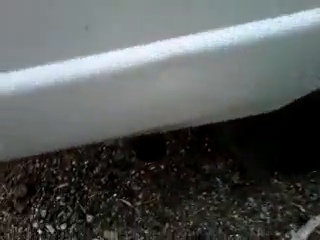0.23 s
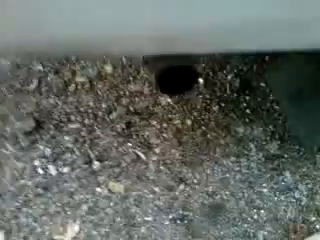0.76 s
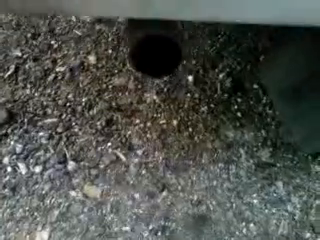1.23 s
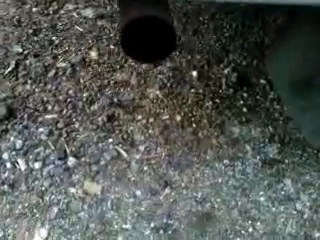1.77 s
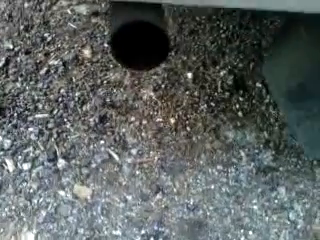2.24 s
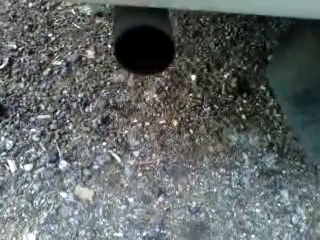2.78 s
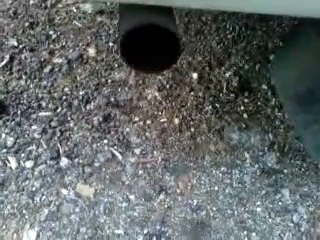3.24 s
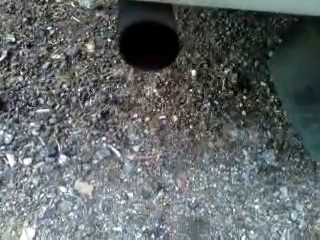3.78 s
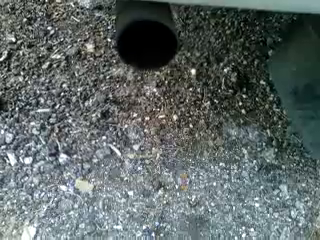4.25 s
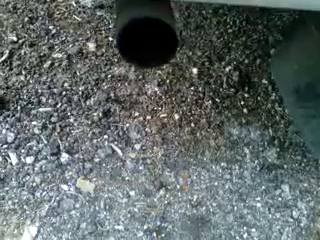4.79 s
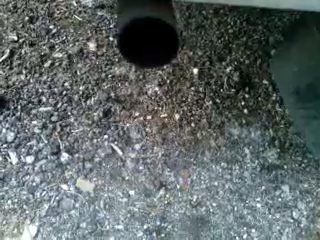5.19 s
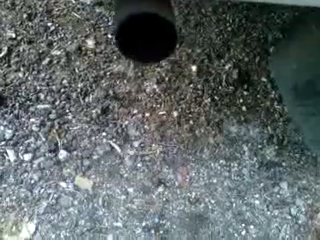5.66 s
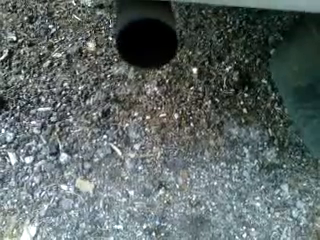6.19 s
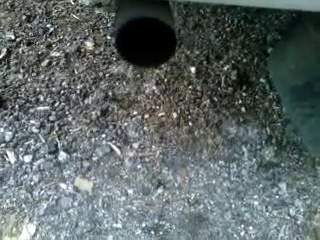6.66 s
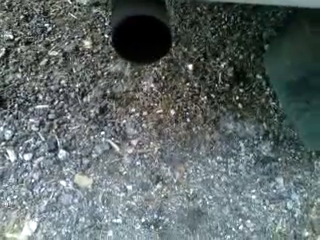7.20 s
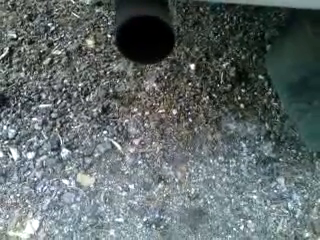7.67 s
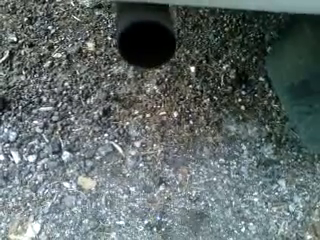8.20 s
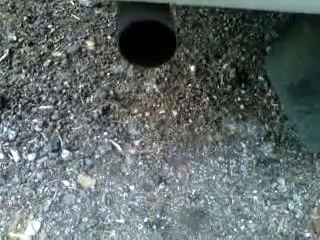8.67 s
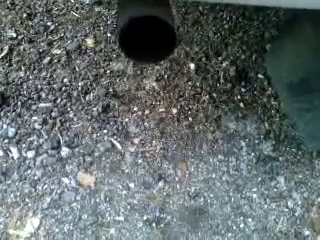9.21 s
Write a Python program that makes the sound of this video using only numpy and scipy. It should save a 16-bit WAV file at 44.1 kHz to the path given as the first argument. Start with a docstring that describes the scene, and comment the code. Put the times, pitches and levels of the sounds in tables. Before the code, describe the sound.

A small four-cylinder engine is already idling at the start, heard outdoors close to the tailpipe above gravel. About twenty-six soft puffs a second merge into a throbbing, fluttering low rumble; the speed wavers slightly, so a hollow pipe drone repeatedly swells and fades. Rushing air and thin hiss lie over it. A tiny scuff comes at once, then a small damped knock with scuffing at 0.5 seconds and a faint high squeak near 0.9. From 0.7 seconds irregular firings thud dully, strongest around 0.8 and 1.3, then scattered until 7.8. The exhaust grows closer, bassier and more buffeting by 1.3 seconds, its pipe tone opening fully by 2.6. Near 4 seconds it drops back abruptly. Faint high scuffs pass at 3.4 and 4.2. Treble hiss flickers from 4.7 onward; the idle continues unbroken to the end, about 9.4 seconds.

```python
"""A small four-cylinder engine idles, heard close to the tailpipe over gravel.
From the start, each firing pushes out a puff that throbs, sounds the muffler and flutters in the pipe.
As the idle hunts, its seventh order drifts on and off a pipe resonance and booms; air rushes under the car
and a treble hiss lies on top. Scuffs of narrow noise come now and then, a small damped body is
knocked at half a second, and from 0.7 s on uneven firings thud as single dips of pressure."""
import sys
import numpy as np
from scipy import signal
from scipy.fft import rfft, irfft
from scipy.io import wavfile
from scipy.ndimage import uniform_filter1d

SR = 44100
rng = np.random.default_rng(int(sys.argv[2]) if len(sys.argv) > 2 else 0)


def pcm_store(signal):
    """Save signal as 16-bit PCM."""
    levels = np.round(np.clip(np.atleast_2d(signal), -1, 1) * 32767)
    wavfile.write(sys.argv[1], SR, levels.astype(np.int16).T)


N = 415863
TIME = np.arange(N) / SR   # s

# uneven firings that thud: (time [s], relative level [dB])
THUD_FIRINGS = [(0.668, -38), (0.764, -26), (0.932, -32), (1.273, -22), (2.44, -29), (2.99, -36),
                (3.302, -34), (3.573, -30), (4.699, -33.5), (5.005, -30), (5.741, -32.5), (6.117, -30),
                (6.587, -31.5), (7.815, -31.5)]
IDLE_HZ = 25.7   # reference firing rate


def from_db(db):
    """Level law: 20 dB is a factor of ten in pressure."""
    return 10 ** (np.asarray(db) / 20)


def rms_one(x):
    """Normalise the effective (root mean square) pressure to 1."""
    return x / np.sqrt(np.mean(x ** 2) + 1e-20)


def in_time(rows):
    """Linear interpolation: each column of a curve at every sample."""
    times, *columns = np.transpose(rows)
    return [np.interp(TIME, times, column) for column in columns]


def cut(x, hz, kind, order=2):
    """Butterworth filtering: a maximally flat passband."""
    return signal.sosfilt(signal.butter(order, hz, kind, fs=SR, output="sos"), x)


def resonate(x, modes):
    """Modal superposition: parallel damped resonances, each with peak gain 1 before its own level."""
    out = 0
    for k, (hz, width, db) in enumerate(modes):
        radius = np.exp(-np.pi * width / SR)   # a wider resonance decays faster
        poles = [1, -2 * radius * np.cos(2 * np.pi * hz / SR), radius * radius]
        ring = signal.lfilter([1, 0, -1], poles, x + 1e-18) * (1 - radius * radius) / 2
        out = out + (-1) ** k * from_db(db) * ring   # neighbours have opposite signs
    return out


def even(x, size=6850):
    """Automatic gain: divide by the running rms over a few firings."""
    power = uniform_filter1d(uniform_filter1d(x ** 2, size), size // 2)
    return x / np.sqrt(power + 1e-20)


def noise(spectrum):
    """Spectral shaping: white noise weighted by a colour, rms 1."""
    hz, db = np.transpose(spectrum)
    bins_hz = np.maximum(np.arange(N // 2 + 1) * SR / N, 1)
    gain = from_db(np.interp(np.log(bins_hz), np.log(hz), db))
    return rms_one(irfft(rfft(rng.standard_normal(N)) * gain, N))


def drift(hz):
    """Random modulation: low-passed noise wanders slowly with spread 1."""
    return noise([(hz / 2, 0), (hz, -3), (hz * 2, -14), (hz * 10, -70)])


def settle(x):
    """First-order relaxation: a control is followed with the inertia of the pipe."""
    build_up_s = 0.046   # time constant
    r = np.exp(-1 / (build_up_s * SR))
    return x[0] + signal.lfilter([1 - r], [1, -r], x - x[0])


def puffs(turns, depth_db, lag):
    """Amplitude modulation: turbulence swells and ebbs once in every firing, timed by the lag [cycles]."""
    return rng.standard_normal(N) * from_db(depth_db * np.cos(2 * np.pi * (turns - lag)))


def throb(turns, lag, buffet_db):
    """Monopole pulsation at the firing rate, with gas buffeting the microphone."""
    swing = -np.sqrt(2) * np.cos(2 * np.pi * (turns - lag))
    buffet = rms_one(cut(puffs(turns, depth_db=-0.5, lag=lag), [10, 45], "band"))
    return swing + from_db(buffet_db) * buffet


def muffler(turns, rough_db):
    """Harmonic series of low orders, blurred by turbulence ringing in the chambers."""
    # firing orders from the second upward: (relative level [dB], lag [cycles])
    low_orders = [(-5, 0.34), (-8, 0.5), (-6.5, .15), (-19.5, 0.45)]
    # chamber resonances: (frequency [Hz], width [Hz], relative level [dB])
    chambers = [(41, 4, -12.5), (74.6, 8.5, 2), (88, 24, -2), (111.8, 58, -7)]
    lines = 0
    for k, (db, lag) in enumerate(low_orders, 2):
        lines = lines + from_db(db) * np.sqrt(2) * np.cos(2 * np.pi * (k * turns - lag))
    rumble = cut(resonate(puffs(turns, depth_db=3.5, lag=0.4), chambers), 170, "low", order=3)
    return lines + from_db(rough_db) * even(rumble)


def boom(turns, swing, bend, lag):
    """Forced vibration on the seventh order; every firing tops it up and nudges its phase."""
    firing = 2 * np.pi * (turns - lag)
    ring = -np.sqrt(2) * np.sin(2 * np.pi * 7 * turns - bend * np.sin(firing))   # bend in rad
    return ring * (1 + swing * np.cos(firing))


def in_tune(speed):
    """Resonance curve: the boom's gain tends to 1 as the seventh order settles on the pipe resonance."""
    boom_hz, boom_width_hz = 182.5, 4.4
    detuning = 2 * (7 * speed - boom_hz) / boom_width_hz
    return settle(1 / np.hypot(1, detuning))


def flutter(turns, clean_db):
    """Flow excitation of the pipe modes; each puff's steep front rings the higher ones as clean overtones."""
    # pipe resonances: (frequency [Hz], width [Hz], relative level [dB])
    pipe_modes = [(177.6, 17, 4), (218, 40, -3.5), (264.4, 23.4, 0.5), (305.5, 54, -7.5), (352.3, 17, -2),
                  (434, 49, -15), (526, 7.6, -10.5)]
    stream = resonate(puffs(turns, depth_db=3.5, lag=0.9), pipe_modes)
    stream = cut(cut(stream, 600, "low"), 130, "high")
    count = np.floor(turns - 0.2)
    fronts = np.diff(count, append=count[-1])   # one impulse per firing
    overtones = cut(resonate(fronts, pipe_modes[1:]), 230, "high", order=4)
    return even(stream) + from_db(clean_db) * rms_one(cut(overtones, 600, "low"))


def rush(turns, gust_db, hollow_db):
    """Broadband air and engine noise under the car, with cavity resonances that each flare on their own."""
    # cavities: (frequency [Hz], width [Hz], relative level [dB])
    hollows = [(755, 40, -2), (1205, 45, .5), (1497, 75, 3), (2320, 55, 0), (2435, 60, 0), (2570, 50, -3),
               (2940, 50, -5), (3290, 50, -9)]
    # broad spectrum: (frequency [Hz], relative density [dB per Hz])
    rush_colour = [(200, 1.5), (400, -1), (600, 1), (900, -1), (1350, 1), (1800, -1.5), (2500, -2.5),
                   (2700, -8.5), (3100, -14.5), (3600, -16.5), (4000, -18), (4600, -39)]
    stream = puffs(turns, depth_db=1.0, lag=0.67)
    ringing = sum(resonate(stream, [mode]) * from_db(gust_db * drift(7.9)) for mode in hollows)
    ringing = rms_one(cut(ringing, 3500, "low", order=6))
    broad = cut(noise(rush_colour), 130, "high") * from_db(0.84 * drift(23))
    return rms_one(broad + from_db(hollow_db) * ringing)


def jet(turns):
    """Jet noise: turbulent gas hisses over the rim of the pipe, pulsed by the firings."""
    return rms_one(cut(puffs(turns, depth_db=3.5, lag=0.3), [1500, 3300], "band", order=3))


def hiss():
    """Spectral shaping: coloured noise in the treble, scaled by a given level curve."""
    # spectrum: (frequency [Hz], relative density [dB per Hz])
    hiss_colour = [(3000, -33), (3900, -11.5), (4250, 6), (4600, 1.5), (5500, 0.5), (6300, -4), (7200, -8),
                   (8000, -17.5)]
    # level curve given to the noise: (time [s], relative level [dB])
    treble = [(0, -64), (.5, -61), (1.2, -59), (1.45, -61.5), (4.66, -63), (4.72, -67), (5.05, -70),
              (5.4, -66), (5.9, -68), (6.04, -63), (6.5, -65.5), (6.62, -71), (7.3, -62), (7.58, -69),
              (7.9, -62), (8.08, -70), (8.36, -63), (8.42, -68.5), (9.0, -66), (9.2, -70), (9.43, -66.7)]
    (treble_db,) = in_time(treble)
    return from_db(treble_db + 1.0) * noise(hiss_colour)


def reflect(x):
    """Image sources: delayed copies from pipe, ground and underbody join the direct sound."""
    # reflections: (delay [s], gain [ratio])
    echoes = [(.00208, .06), (.0058, .06), (.00655, .045), (.0078, .05), (.0084, -.055), (.0116, .05),
              (.0129, .04), (.0153, .04), (.0167, .04)]
    return x + sum(gain * np.roll(x, round(delay * SR)) for delay, gain in echoes)


def scuffs():
    """Band-limited noise bursts: short Gaussian swells heard as scuffs and faint high squeaks."""
    # (time [s], half length [s], centre [Hz], width [Hz], level [dB])
    bursts = [(0.017, 0.012, 1020, 496, -46), (0.501, 0.024, 950, 450, -47),
              (0.497, 0.015, 5800, 1500, -53), (0.531, 0.022, 2200, 900, -48),
              (.585, 0.022, 5550, 600, -60), (0.907, 0.011, 5260, 500, -53.5),
              (3.447, 0.034, 5600, 500, -60), (4.18, 0.021, 5130, 694, -59)]
    out = np.zeros(N)
    for s, length, hz, width, db in bursts:
        band = cut(rng.standard_normal(N), [max(hz - width / 2, 20), hz + width / 2], "band")
        swell = np.exp(-np.minimum(((TIME - s) / length) ** 2, 20))
        out += from_db(db) * rms_one(band) * swell
    return out


def knock():
    """Impulse response: two quick touches near the microphone ring a small damped body."""
    # touches: (time [s], peak level [dB])
    touches = [(0.4912, -30.5), (.499, -50)]
    # modes of the body: (frequency [Hz], width [Hz], relative level [dB])
    body_modes = [(756, 100, 3), (990, 100, 7), (1410, 160, 1)]
    out = np.zeros(N)
    for s, db in touches:
        ring = resonate(signal.unit_impulse(N, int(s * SR)), body_modes)
        out += from_db(db) * ring / np.abs(ring).max()
    return out


def thuds(length_s, level_db):
    """Pressure transient: a weak firing leaves one dip with a swell on each side."""
    out = np.zeros(N)
    for s, db in THUD_FIRINGS:
        u = np.clip((TIME - s) / length_s, -10, 10)
        out -= from_db(db + level_db) * (1 - 2 * u * u) * np.exp(-u * u)
    return out


def shake():
    """Transient excitation: gain of the extra muffler sound around each thud."""
    half_length_s, shake_db = 0.063, -12   # level relative to the thud's table level
    out = 0
    for s, db in THUD_FIRINGS:
        out = out + from_db(db + shake_db) * np.exp(-np.minimum(((TIME - s) / half_length_s) ** 2, 20))
    return out


def scene():
    """Superposition: one firing phase drives the exhaust layers, which grow with speed and gas stream."""
    # the idle hunts up and down: (time [s], firing rate [Hz])
    hunting = [(0.1, 25.37), (0.26, 25.95), (0.4, 25.46), (0.58, 26.16), (0.82, 24.81), (1.18, 26.22),
               (1.38, 25.72), (1.66, 26.09), (1.82, 24.87), (2.12, 25.86), (2.36, 25.57), (2.7, 26.18),
               (3.02, 25.07), (3.6, 26.18), (3.82, 26.29), (4.02, 24.96), (4.46, 26.14), (4.82, 25.6),
               (4.98, 25.97), (5.18, 25.37), (5.6, 26.28), (5.86, 25.33), (6.26, 25.33), (6.5, 26.24),
               (6.76, 25.36), (7.06, 25.76), (7.26, 25.17), (7.72, 25.9), (7.92, 25.37), (8.18, 25.8),
               (8.52, 25.51), (9.0, 25.86), (9.2, 25.18), (9.32, 25.35)]
    # the microphone moves into the gas stream, then to its edge: (time [s], stream level [dB])
    gas_stream = [(0, -43.5), (.5, -40.5), (1.25, -34.5), (3.9, -33.5), (4.07, -40), (4.5, -40),
                  (7.75, -40.5), (8.2, -43), (9.43, -42)]
    # each law: (level at the stream's edge and reference idle [dB], share of the stream's swing [ratio],
    # slope [dB per extra firing per s])
    throb_law = (-39.5, 1.0, 1.2)
    muffler_law = (-44, 1.1, 0.21)
    boom_law = (-36, 0.83, .3)
    flutter_law = (-48, 0.57, 3.4)
    rush_law = (-49, .14, 0.46)
    jet_law = (-63.5, 0.79, 1.3)
    edge_db = -40   # stream level at its edge

    (speed,), (stream_db,) = in_time(hunting), in_time(gas_stream)
    turns = 0.185 + np.cumsum(speed) / SR   # firing cycles
    surge = settle(speed) - IDLE_HZ
    # at first the bumper hides the mouth of the pipe: -4 dB, fading over 1.76 s to end at 2.57 s
    shade_db = -4 * np.clip((2.57 - TIME) / 1.76, 0, 1)

    def level(law):
        """Gain law: decibels add for stream and speed."""
        db, share, slope = law
        return from_db(db + share * (stream_db - edge_db) + slope * surge)

    low = level(throb_law) * throb(turns, lag=0.16, buffet_db=-13.0)
    muffler_gain = np.hypot(level(muffler_law), shake())   # powers add
    low = low + muffler_gain * muffler(turns, rough_db=-3.0)

    boom_gain = level(boom_law) * in_tune(speed) * from_db(shade_db)
    pipe = boom_gain * boom(turns, swing=0.31, bend=0.05, lag=0.034)
    # the flutter takes only part of the shade, and wanders
    flutter_gain = level(flutter_law) * from_db(0.61 * shade_db + 0.79 * drift(5.3))
    pipe = pipe + flutter_gain * flutter(turns, clean_db=-10.5)

    air = level(rush_law) * rush(turns, gust_db=4.5, hollow_db=-8.0)
    air = air + level(jet_law) * jet(turns) + hiss()
    events = scuffs() + knock() + thuds(length_s=0.0039, level_db=1.0)
    return (low + pipe + reflect(air) + events)[None]


def record(dry):
    """Elliptic low-pass filtering: the top is cut steeply above 7230 Hz."""
    return signal.sosfilt(signal.ellip(12, 0.2, 70, 7230, fs=SR, output="sos"), dry)


dry = scene()
out = record(dry)
pcm_store(out)
```